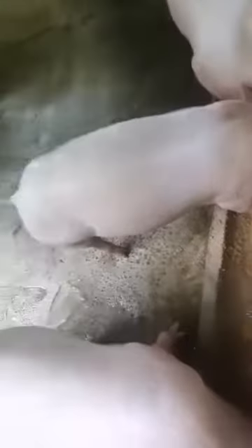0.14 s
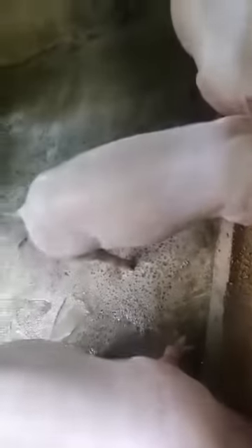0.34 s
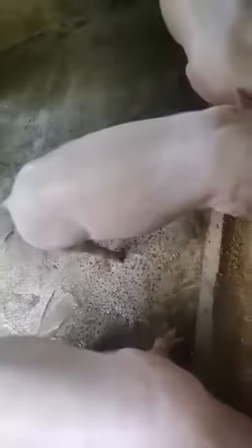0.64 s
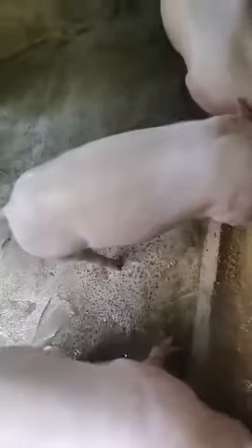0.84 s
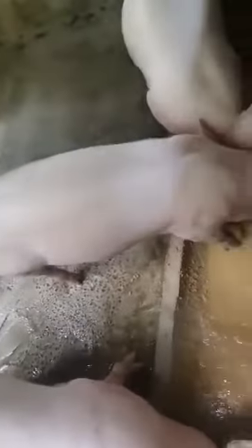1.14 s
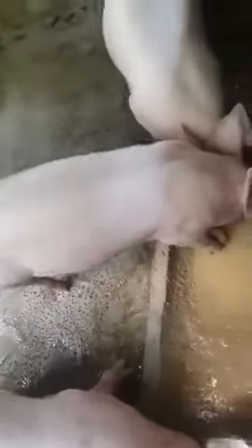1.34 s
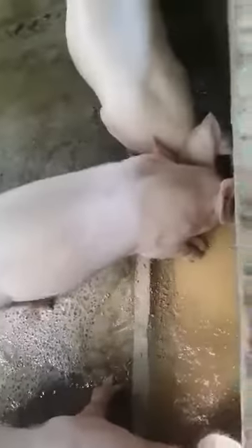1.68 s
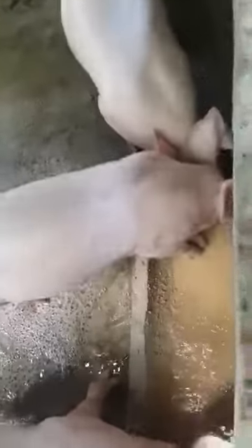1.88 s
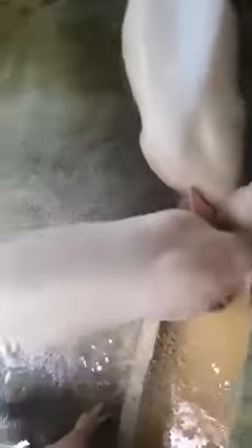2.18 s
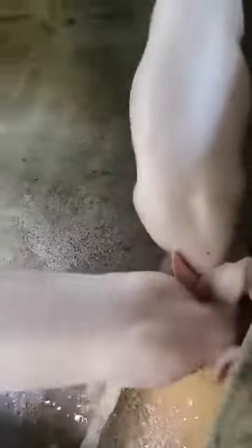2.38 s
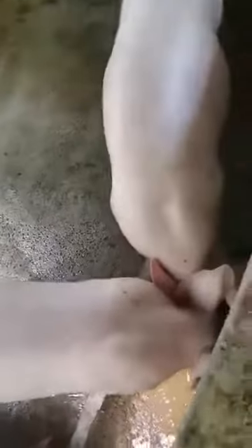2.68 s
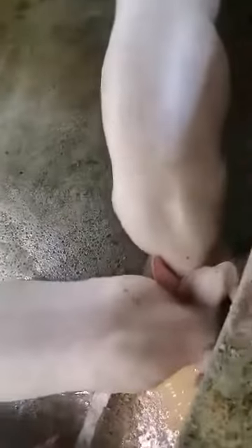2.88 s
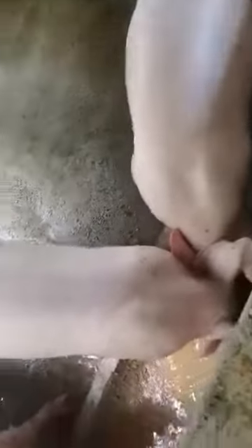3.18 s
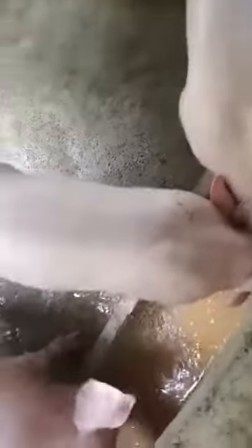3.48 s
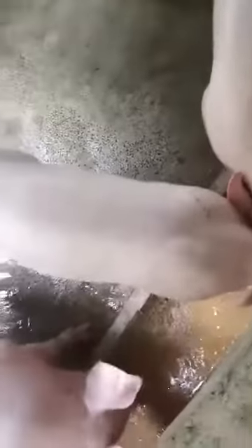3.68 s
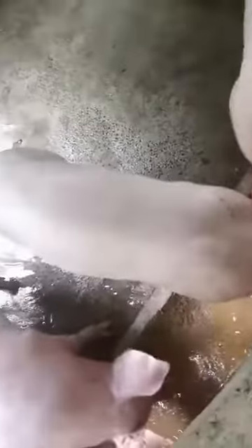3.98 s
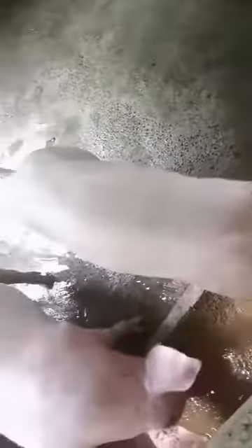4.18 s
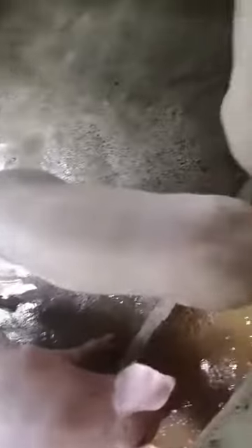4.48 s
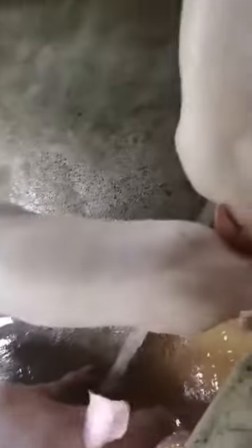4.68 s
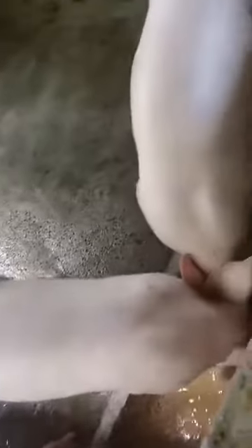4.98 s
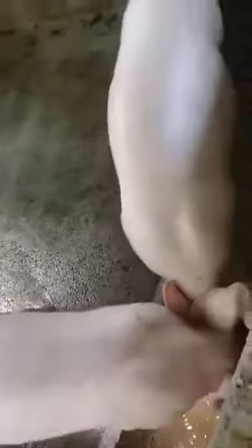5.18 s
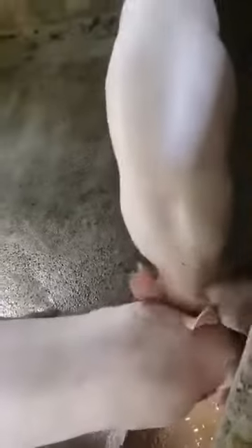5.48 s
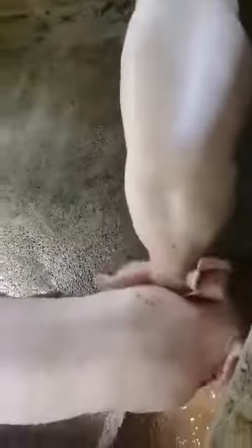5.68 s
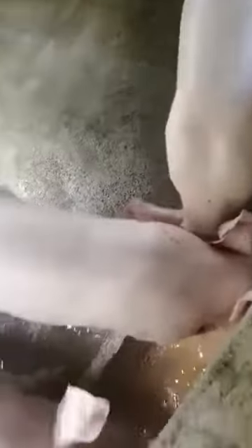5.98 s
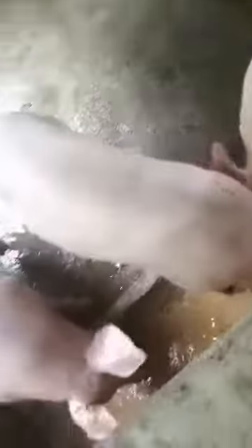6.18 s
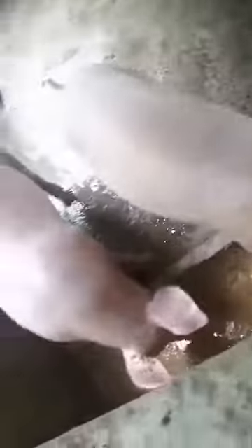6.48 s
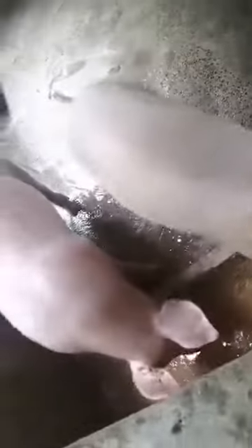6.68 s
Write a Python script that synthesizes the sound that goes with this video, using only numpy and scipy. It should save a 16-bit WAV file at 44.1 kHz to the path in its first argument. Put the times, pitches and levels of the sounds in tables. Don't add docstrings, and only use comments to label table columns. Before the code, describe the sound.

Wet sucking, popping lip smacks and bubbly sloshing from feeding pigs, under bright falling chick peeps and a faint low farmyard drone.

```python
import sys
import numpy as np
from scipy import signal
from scipy.fft import rfft, irfft, next_fast_len
from scipy.io import wavfile
from scipy.ndimage import uniform_filter1d, map_coordinates

SR = 44100
rng = np.random.default_rng(int(sys.argv[2]) if len(sys.argv) > 2 else 0)


def volts_from_db(level):
    exponent = np.asarray(level, float) / 20
    return 10 ** exponent


def waveform_to_disk(signal):
    frames = np.transpose(np.atleast_2d(signal))
    scaled = np.clip(frames, -1, 1) * 32767
    samples = np.round(scaled).astype(np.int16)
    wavfile.write(sys.argv[1], SR, samples)


N = 301644
TIME = np.arange(N) / SR
LEFT_LAG_S = .00021
WET_GROWS, WET_FROM_DB = 0.45, -19.5

# start_s, length_s, level_db, spray_relative_db, slosh_relative_db
DRAWS = [(-.05, 0.083, -44.5, -18, 9), (0.157, 0.28, -35.5, -11.5, -1.5), (0.45, 0.42, -41.5, -28, 2),
         (1.172, 0.31, -41, -16, -19), (1.59, 0.17, -49, -19, -26), (1.792, 0.39, -48.5, 0, 6),
         (2.136, 0.55, -38.5, -19, -2), (2.79, 0.1, -39.5, -5.5, 1), (2.973, 0.36, -46, -10, -24),
         (3.339, 0.36, -40, -5.5, 0), (3.753, 0.22, -33.5, -10.5, 0), (4.104, 0.093, -39, 2, -33),
         (4.276, 0.3, -38, -13.5, -3.5), (4.687, 0.096, -35, -7.5, 0.5), (4.981, 0.21, -35, -12.5, -7),
         (5.122, 0.1, -34, -24, 2), (5.254, 0.39, -38.5, -8.5, -28), (5.67, 0.089, -46.5, -2.5, 8.5),
         (5.834, 0.18, -31.5, -15.5, -23), (6.097, 0.25, -35, -13, -2.5), (6.386, 0.15, -35.5, -37, -16),
         (6.686, 0.11, -50, -2, -34)]
# start_s, peak_db
SPLASHES = [(1.329, -35), (1.5355, -31.5), (1.606, -29), (1.727, -56), (1.946, -53), (2.274, -36.5),
            (2.492, -28.5), (2.65, -30), (3.243, -28), (3.357, -29.5), (3.481, -30), (3.576, -28.5),
            (3.7963, -24.5), (3.926, -32), (4.034, -28.5), (4.0986, -35), (4.489, -28), (4.7744, -35),
            (5.137, -26.5), (5.228, -30.5), (5.389, -26.5), (5.5543, -30.5), (5.6201, -31.5), (6.104, -28),
            (6.4353, -30.5), (6.8004, -47), (.907, -46), (1.2745, -46), (1.689, -46), (1.868, -55),
            (1.978, -35), (2.781, -34.5), (2.865, -35), (2.941, -33), (4.71, -37), (5.285, -34),
            (5.723, -35.5), (6.449, -36)]
# pitch_hz, level_db
MASH_COLOUR = [(240, -71), (480, -12), (972, -7), (1270, -8.5), (2340, -3), (3200, -7), (5500, -14.5),
               (7150, -26.5), (12100, -120)]
# pitch_hz, level_db
SPRAY_COLOUR = [(2650, -16), (4500, -4), (4810, -4), (5470, -12), (6270, -4), (8380, -14.5), (9130, -13),
                (10100, -17.5), (13200, -23.5), (13500, -80), (14000, -43)]
# pitch_hz, level_db
SLOSH_COLOUR = [(120, -32.5), (220, -1.5), (300, -7.5), (500, -2), (800, -36), (1500, -41.5)]
# start_s, second_partial_hz, its_level_db, nose_level_db
GRUNTS = [
    [(0.0, 111.3, -57, -40), (0.07, 118, -52.5, -27.5), (0.235, 117.4, -51, -26)],
    [(3.57, 105.1, -59, -27), (3.632, 105.7, -50, -27), (3.77, 99.3, -60, -30)],
    [(4.26, 113.8, -48, -29.5), (4.354, 138.1, -48, -22), (4.56, 142.2, -55, -37)],
]
# pitch_hz, width_hz, level_db
NOSE = [(258, 160, 8), (356, 42, 15), (630, 79, 5.2)]
# start_s, level_db
DRONE_LEVEL = [(0.0, -40), (1.98, -47), (2.48, -43), (4.53, -39.5), (6.63, -40.5), (6.84, -39)]
# pitch_hz, level_db
DRONE_COLOUR = [(20, -21), (42, -2.0), (54, 14.5), (68, -7.5), (110, 0.5), (300, -38.5)]
# pitch_hz, level_db
YARD_COLOUR = [(15, -10), (25, 10), (65, 2), (348, 3), (901, -69), (3320, -28), (4060, -34), (9280, -21),
               (10000, -15), (13000, -81), (22000, -120)]
# start_s, length_s, start_hz, end_hz, level_db
LONG_PEEPS = [(0.134, 0.182, 4820, 2864, -37), (0.544, 0.19, 4680, 2850, -37.5),
              (0.942, 0.2, 4765, 2916, -36.5), (1.335, 0.18, 4640, 2857, -38.5),
              (1.557, 0.12, 5060, 2810, -42), (2.476, 0.18, 5180, 3254, -40.5),
              (2.972, 0.19, 5183, 3330, -36.5), (3.373, 0.13, 5338, 3730, -36.5),
              (3.553, 0.13, 4720, 2900, -40.5), (4.11, 0.26, 4950, 2986, -48),
              (4.548, 0.135, 5000, 2950, -38.5), (4.929, 0.13, 5040, 3527, -38.5),
              (5.752, 0.14, 5007, 3414, -40.5), (6.411, 0.18, 5410, 3530, -41.5),
              (6.547, 0.12, 4990, 3016, -39)]
# start_s, length_s, start_hz, end_hz, level_db
SHORT_PEEPS = [(0.011, 0.088, 4440, 3770, -41), (0.245, 0.11, 4620, 3700, -42),
               (0.757, 0.076, 4840, 4200, -45), (1.085, 0.16, 5230, 4315, -45),
               (1.793, 0.16, 4960, 4024, -38.5), (2.125, 0.12, 5115, 4377, -37.5),
               (0.777, 0.07, 4060, 3295, -43), (1.984, 0.18, 5080, 4500, -46),
               (2.228, 0.11, 4200, 3180, -38.5), (2.545, 0.11, 4960, 4300, -41.5),
               (3.08, 0.11, 4700, 3570, -44), (3.457, 0.1, 4390, 3650, -45),
               (3.839, 0.069, 4360, 3530, -36), (4.001, 0.089, 4330, 3350, -40.5),
               (4.284, 0.16, 5820, 4880, -44), (4.643, 0.12, 4250, 3890, -45),
               (5.033, 0.086, 5370, 4720, -42.5), (5.105, 0.1, 4490, 3806, -38.5),
               (5.3, 0.097, 4740, 3810, -45), (5.446, 0.064, 4440, 3950, -42),
               (5.65, 0.084, 4690, 4200, -45.5), (5.978, 0.11, 4930, 4354, -45.5),
               (6.145, 0.14, 4630, 3960, -49), (6.474, 0.19, 4900, 4220, -53),
               (6.779, 0.095, 5750, 5480, -43), (0.059, .13, 4370, 3916, -46),
               (0.449, .12, 4710, 4515, -53.5), (4.374, 0.086, 4590, 3750, -41.5),
               (4.678, 0.049, 4070, 3760, -41), (6.601, 0.086, 4340, 3700, -48)]
# delay_s, level_db, left_minus_right_db
WALLS = [(.013, -11, 6), (.029, -13, -6), (.047, -14, 5), (.07, -16, -5)]
# pitch_hz, level_db
SCATTERS = [(3000, -5), (3800, 0)]
# start_s, direct_sound_db
BROOD_NEARNESS = [(.8, 0), (1.1, -4), (2, -4), (2.2, -1), (2.5, -4.5), (6.84, -3.5)]
# pitch_hz, decay_s
PEN_ECHO = [(200, 0.067), (2000, 0.3), (3100, 0.2), (4500, 0.5), (10000, 0.05)]
# start_s, peak_db, mouth_pitch_hz
LIP_SMACKS = [(0.406, -22.5, 670), (1.169, -24, 1440), (1.604, -24, 1470), (1.884, -20.5, 1150),
              (2.271, -18.5, 1510), (2.495, -18, 970), (2.523, -17.5, 635), (2.643, -16, 946),
              (2.807, -21, 695), (2.94, -14.5, 870), (3.199, -20.5, 1080), (3.577, -15, 864),
              (3.832, -19.5, 1430), (3.918, -17.5, 980), (4.035, -17, 950), (4.722, -20.5, 1480),
              (4.971, -20.5, 1130), (5.133, -21, 1120), (5.186, -14.5, 995), (5.286, -16.5, 990),
              (5.553, -15, 983), (5.917, -15.5, 1090), (5.972, -13.5, 1050), (6.063, -18, 700),
              (0.951, -24, 2020), (1.296, -17, 2180), (1.312, -24, 1640), (1.417, -20, 2020),
               (1.681, -18.5, 2590), (1.957, -25.5, 1580), (2.011, -21, 1530), (2.221, -16.5, 2010),
               (2.477, -23.5, 2170), (2.923, -32, 1860), (3.311, -17.5, 1660), (3.344, -19.5, 1640),
               (3.363, -16, 2210), (3.474, -18.5, 1910), (3.759, -15.5, 1675), (4.117, -21.5, 1550),
               (4.238, -19.5, 1730), (4.397, -16, 1570), (4.489, -20.5, 1820), (5.147, -17, 2300),
               (5.396, -14, 1780), (5.62, -20, 2330), (5.733, -17, 2370), (6.434, -17.5, 2110),
               (6.457, -16.5, 2370)]
# start_s, peak_db, mouth_pitch_hz
SNAPS = [(.51, -25.5, 447), (.51, -23, 835), (3.27, -22, 610), (3.41, -36, 1090), (5.391, -13, 2100),
         (5.553, -17, 2050), (5.732, -33, 1970), (4.42, -19, 1140), (1.988, -23, 2180),
         (2.106, -25.5, 1730), (2.216, -21, 2570), (2.378, -20, 2520), (2.484, -22.5, 1640),
         (2.64, -15.5, 2560), (2.94, -14.5, 390), (3.155, -35, 1270), (3.758, -18, 2420), (3.8, -17.5, 980),
         (3.85, -19, 1103), (3.918, -19.5, 1710), (4.035, -21, 1530), (4.035, -14.5, 2520),
         (4.063, -24.5, 1130), (4.24, -23, 2450), (4.954, -29, 2280), (5.197, -23, 1080),
         (5.207, -22.5, 1480), (6.62, -23, 1480), (6.744, -21.5, 2070), (1.169, -23.5, 2220),
         (1.329, -22, 870), (1.411, -22, 965), (1.689, -24, 870), (1.884, -40, 1640), (1.986, -24, 577),
         (2.01, -21.5, 496), (2.228, -19.5, 930), (2.245, -20, 408), (2.666, -18, 1080), (2.924, -20, 1090),
         (3.21, -25.5, 960), (3.31, -19.5, 1040), (3.358, -19.5, 650), (3.382, -18, 1080),
         (3.474, -21.5, 1500), (3.545, -22.5, 450), (4.174, -25, 1090), (4.49, -24, 960),
         (4.575, -29, 1340), (4.795, -26.5, 1350), (5.148, -15, 1760), (5.3, -23, 990), (5.389, -17, 1110),
         (5.4, -28, 1000), (5.407, -21, 1750), (5.421, -16.5, 1790), (5.433, -19, 1840), (5.875, -22, 980),
         (5.92, -17.5, 470), (5.975, -27, 2200), (6.0, -29, 1080), (6.33, -22.5, 2230), (6.55, -23, 1170)]
SMACKS = LIP_SMACKS
# start_s, left_minus_right_db
SNOUT_PLACES = [(.4, -3), (1.35, -5), (1.95, 0), (2.3, 0), (2.6, 4), (3.3, 1), (3.8, 0), (4.3, 0),
                (4.75, -3), (5.3, -2.5), (5.7, -4), (6.5, -2)]
# start_s, peak_db, pitch_hz, left_minus_right_db
TICKS = [(0.406, -21.5, 1170, -2), (1.331, -28, 1460, -2), (1.691, -26, 1120, -1), (1.953, -21, 4180, -4),
         (2.012, -27, 3100, -3), (1.54, -25.5, 4430, -24), (1.548, -20.5, 4800, 3), (1.729, -21.5, 7140, 1),
         (1.948, -21, 4020, -14), (1.9793, -18.5, 4700, -15), (1.985, -23, 4400, 0),
         (1.605, -21.5, 1490, -8), (1.418, -22, 2150, -7), (2.271, -24, 1470, 0), (4.398, -21, 1530, 0),
         (5.186, -13, 990, -2), (5.286, -29, 960, -2), (3.3598, -31, 5960, 18), (3.7948, -40, 6630, 18),
         (4.0325, -20.5, 3960, -5), (4.099, -21.5, 5050, 6), (4.495, -23, 3960, 19),
         (5.228, -23, 3500, -10), (5.556, -24.5, 5800, -6)]
# start_s, length_s, level_db
PUFFS = [
    (2.068, 0.15, -34.5),
    (2.306, 0.07, -45),
    (2.388, 0.019, -25),
    (2.494, 0.14, -19.5),
    (2.724, 0.027, -27),
    (2.783, 0.24, -42),
]
# start_s, peak_db, swing_hz
THUMPS = [
    (2.45, -8.5, 88),
    (2.555, -14, 114),
    (2.618, -3.5, 129),
    (2.773, -11, 72),
]
# pitch_hz, level_db
RUMBLE_COLOUR = [(15, -36), (50, -5.0), (95, -10.5), (160, -20.5), (400, -38), (2000, -57.5)]
# start_s, length_s, pulse_rate_hz, level_db
SNORTS = [
    (3.76, 0.099, 62, -38),
    (5.189, 0.066, 52.16, -41),
    (5.484, 0.087, 56, -41.5),
    (5.893, 0.17, 54.03, -37),
    (6.194, 0.18, 60.1, -38.5),
    (6.389, 0.21, 59.16, -40.5),
]
# pitch_hz, width_hz, level_db
SNOUT = [(260, 43, 8), (519, 11.4, 0), (133.2, 4.1, 7.5)]
# pitch_hz, level_db
AUDIBLE = [(1000, -82), (3000, -55.5), (6000, -54), (9400, -117), (9900, -17), (12600, -98), (12850, -44)]
# pitch_hz, left_minus_right_db
PORTS = [(100, 2.5), (600, 2.5), (1200, -2), (2300, -5.5), (4100, 0.5), (7500, 6), (13000, 11)]
# pitch_hz, level_db
GRILLE = [(9600, 0), (10000, -3), (12500, -4), (12900, 6), (13300, 6)]


def unit(x):
    return x / np.sqrt(np.mean(x ** 2) + 1e-20)


def along(points, hz):
    f, v = np.transpose(points)
    return np.interp(np.log(hz + 1), np.log(f + 1), v)


def curves(rows):
    s, *cols = np.transpose(rows)
    return [np.interp(TIME, s, c) for c in cols]


def wobble(rate):
    return map_coordinates(rng.standard_normal(int(N * rate / SR) + 4), [TIME * rate])


def filtered(x, response):
    m = next_fast_len(N + SR // 2)
    return irfft(rfft(x, m) * response(np.fft.rfftfreq(m, 1 / SR)), m)[..., :N]


def cavities(modes):
    def response(f):
        total = 0
        for k, (centre, width, db) in enumerate(modes):
            ring = 1j * f * width / (centre * centre - f * f + 1j * f * width)
            total = total + (-1) ** k * volts_from_db(db) * ring
        return total
    return response


def hiss(spectrum, alike, lag_s=0):
    own, shared = rng.standard_normal((2, N)), rng.standard_normal(N)
    share = np.clip(alike, 0, 1)
    shared = np.array([np.roll(shared, int(lag_s * SR)), shared])
    noise = np.sqrt(share) * shared + np.sqrt(1 - share) * own
    return unit(filtered(noise, lambda hz: volts_from_db(along(spectrum, hz))))


def bubbles(s, hz, t60, gain, pan_db, lag, rise, size=1024):
    t = np.arange(size) / SR
    swell = 1 - np.exp(-t * hz[:, None] * 0.8)
    fade = volts_from_db(-60 * t / t60[:, None]) * swell
    climb = 1 + rise * t / t60[:, None]
    tone = gain[:, None] * fade * np.sin(2 * np.pi * hz[:, None] * t * climb)

    def port(side):
        first = np.clip((s + side * lag / 2) * SR, 0, N).astype(int)
        at = first[:, None] + np.arange(size)
        heard = tone * volts_from_db(side * pan_db / 2)[:, None]
        return np.bincount(at.ravel(), heard.ravel(), N + size + 1)[:N]
    return np.array([port(1), port(-1)])


def held(s, length, rise_s, fall_s):
    t = TIME - np.array(s)[:, None]
    ending = 1 + (np.array(length)[:, None] - t) / fall_s
    return np.clip(np.minimum(t / rise_s, ending), 0, 1) ** 2


def bursts(s, db, fade_db_s):
    kicks = np.bincount((s * SR).astype(int), volts_from_db(db), N)
    return signal.lfilter([1], [1, -volts_from_db(-abs(fade_db_s) / SR)], uniform_filter1d(kicks, size=64))


def flows():
    s, length, db, spray_db, slosh_db = np.transpose(DRAWS)
    draws = volts_from_db([db, db + spray_db, db + slosh_db]) @ held(s, length, rise_s=0.04, fall_s=0.11)
    s, db, hz = np.transpose(SMACKS)
    gush_db = db + WET_GROWS * (db - WET_FROM_DB) / 2 - 16
    gush = bursts(s, gush_db, fade_db_s=299)
    gulp = bursts(s, gush_db - 2 - 14 * np.log2(hz / 1000), fade_db_s=299)
    s, db = np.transpose(SPLASHES)
    splash = bursts(s, db - 5, fade_db_s=253)
    lull = volts_from_db(-48 + np.array([[0], [-20], [-5]]))
    return np.sqrt(draws ** 2 + lull ** 2 + np.array([gush, splash, gulp]) ** 2)


def patches(x, patchy_db):
    z = signal.stft(x, nperseg=512)[2]
    field = uniform_filter1d(rng.standard_normal(z.shape[1:]), 5, 0)
    field = uniform_filter1d(field, 6, 1)
    return signal.istft(z * volts_from_db(patchy_db * unit(field)), nperseg=512)[1][:, :N]


def sucking(count=3000):
    mash_flow, spray_flow, slosh_flow = flows()
    u, g = rng.random((count, 2)), rng.standard_normal((count, 3))
    s = u[:, 0] * N / SR
    hz = np.clip(1500 * np.exp(0.415 * g[:, 0]), 450, 6000)
    size = volts_from_db(np.minimum(-5 * np.log(1 - u[:, 1]), 9))
    shift = np.interp(u[:, 0] * N, np.arange(N), wobble(3))
    lag = LEFT_LAG_S + 0.00024 * shift + .00005 * g[:, 2]
    crackle = unit(bubbles(s, hz, 26 / hz, size, 3 * g[:, 1], lag, rise=0.1, size=640))
    clumps = .9 * np.tanh(wobble(35) / 1.5)
    turbulence = hiss(MASH_COLOUR, alike=0.21, lag_s=LEFT_LAG_S)
    body = mash_flow * volts_from_db(3.0 * clumps) * (volts_from_db(-5.5) * crackle + volts_from_db(0.5) * turbulence)
    spray = spray_flow * volts_from_db(0.31 * clumps + 2.5 * wobble(27)) * hiss(SPRAY_COLOUR, alike=0.058)
    slosh = slosh_flow * volts_from_db(-8.0 + 0.21 * wobble(33)) * hiss(SLOSH_COLOUR, alike=0.92)
    return volts_from_db(-1.0) * patches(body + spray + slosh, patchy_db=2.6)


def pulses(rate_hz, jitter):
    turns = np.cumsum(rate_hz * (1 + jitter * wobble(40))) / SR
    closures = np.diff(np.floor(turns), prepend=0)
    return unit(closures * volts_from_db(0.37 * rng.standard_normal(N))), turns


def grunts():
    out = np.zeros(N)
    for rows in GRUNTS:
        hz, db, nose_db = curves(rows)
        gate = np.clip(np.minimum(TIME - rows[0][0] + 0.00092, rows[-1][0] - TIME) / 0.039, 0, 1)
        train, turns = pulses(hz / 2, jitter=.06)
        clean = np.sin(4 * np.pi * turns) + volts_from_db(-9.5) * np.sin(2 * np.pi * turns)
        nose = unit(filtered(train + 0.59 * rng.standard_normal(N), cavities(NOSE)))
        hum = volts_from_db(db + 16.0 + 2.1 * wobble(30)) * clean
        out += gate * (hum + volts_from_db(nose_db - 12.5) * nose)
    return out


def yard():
    drone = hiss(DRONE_COLOUR, alike=0.88)
    swell_db = 2.5 * wobble(1.8)
    bustle = volts_from_db(-57.5 + swell_db) * hiss(YARD_COLOUR, alike=0.78)
    return volts_from_db(curves(DRONE_LEVEL)[0] - 6.0) * drone + bustle


def flock(knee, count=26):
    peeps = []
    for a, b, c in rng.random((count, 3)):
        peeps.append((a * N / SR, .1 + 0.048 * b, 4500 + 800 * c, 3700 + 650 * c, -54, knee))
    return peeps


def chicks():
    out = np.zeros(N + SR)
    waver_hz = 60 * np.pad(wobble(120), (0, SR))
    long_knee, short_knee, sag = .66, .47, .36
    peeps = [(*p, long_knee) for p in LONG_PEEPS] + [(*p, short_knee) for p in SHORT_PEEPS]
    for s, length, top_hz, end_hz, db, knee in peeps + flock(short_knee):
        u = np.arange(int(length * SR)) / (length * SR)
        span = slice(int(s * SR), int(s * SR) + len(u))
        fall = np.interp(u, [0, knee, (1 + 3 * knee) / 4, 1], [0, sag, .68, 1])
        fall = uniform_filter1d(fall, 300, mode="nearest")
        hz = top_hz + (end_hz - top_hz) * fall + waver_hz[span]
        swell = (.2 + u) * np.clip(np.minimum(u / .3, (1 - u) / .04), 0, 1)
        out[span] += volts_from_db(db + 6.5) * swell * np.sin(2 * np.pi * np.cumsum(hz) / SR)
    return out[:N] * volts_from_db(3 * wobble(90))


def pen(x):
    hz, t, z = signal.stft(rng.standard_normal((2, SR // 2)), SR, nperseg=256)
    tail = signal.istft(z * volts_from_db(-60 * t / along(PEN_ECHO, hz)[:, None]), SR, nperseg=256)[1]
    tail = tail / np.linalg.norm(tail[0])
    return signal.fftconvolve(np.pad(x, (200, 0))[None], tail, axes=1)[:, :N]


def distant_brood(peeps):
    scattered = filtered(peeps, lambda hz: volts_from_db(along(SCATTERS, hz)))
    thrown = 0
    for delay_s, db, pan_db in WALLS:
        sides_db = db + np.array([[pan_db], [-pan_db]]) / 2
        thrown = thrown + volts_from_db(sides_db) * np.roll(scattered, int(delay_s * SR))
    spot = (TIME / .4).astype(int) % 6
    ringing = volts_from_db(-3) * sum(pen(scattered * (spot == k)) for k in range(6))
    direct = volts_from_db(curves(BROOD_NEARNESS)[0]) * np.array([peeps, np.roll(peeps, 2)])
    return direct + thrown + ringing


def smacks(count=10):
    rows = SMACKS + SNAPS
    s, db, hz = (np.repeat(c, count) for c in np.transpose(rows))
    pan_db = np.interp(s, *np.transpose(SNOUT_PLACES))
    g = rng.standard_normal((len(rows), count, 3))
    lag = np.repeat(LEFT_LAG_S + 0.00018 * g[:, 0, 2], count)
    follower = np.tile(np.arange(count) > 0, len(rows))
    g = g.reshape(-1, 3) * follower[:, None]
    spread = np.tile(np.linspace(.6, .1, count), len(rows))
    late = (.013 - 0.0073 * spread) * abs(g[:, 0])
    pitch = np.clip(hz * np.exp(spread * (g[:, 1] + .5 * follower)), 400, 5500)
    bareness = np.clip(1 + (db + 18) / 14, .5, 1)
    life = (.6 - .1 * follower) / np.sqrt(pitch) * bareness
    strength = volts_from_db(db + 4 - 10 * follower - 300 * late)
    pops = bubbles(s + late, pitch, life, strength, pan_db, lag, rise=0.056, size=768)
    spit_hz, spit_gain = 7000 * np.exp(0.42 * g[:, 2]), volts_from_db(db - 29 - 38 * late)
    spit = bubbles(s + late, spit_hz, 0.02 + 0 * s, spit_gain, pan_db, lag, rise=0.098, size=256)
    return pops + spit


def lingering(count=14):
    s, db, hz = (np.repeat(c, count) for c in np.transpose(SMACKS + SNAPS))
    late, g = .05 * rng.random(len(s)), rng.standard_normal((2, len(s)))
    pitch = hz * np.exp(0.051 * g[0])
    drain_db = 19.5 * np.log2(np.minimum(hz / 1300, 1))
    wet_db = db + WET_GROWS * (db - WET_FROM_DB)
    strength = volts_from_db(wet_db - 244 * late + 5.3 * g[1] + drain_db)
    pan_db = np.interp(s, *np.transpose(SNOUT_PLACES))
    return bubbles(s + late, pitch, 0.43 / np.sqrt(pitch), strength, pan_db, LEFT_LAG_S + 0 * s, rise=0.02)


def ticks():
    s, db, hz, pan_db = np.transpose(TICKS)
    return bubbles(s, hz, np.minimum(45 / hz, .011), volts_from_db(db + 4.5), pan_db, 0 * s, rise=0.013, size=512)


def port_air():
    start, length, level_db = np.transpose(PUFFS)
    flow = volts_from_db(level_db) @ held(start, length, rise_s=0.056, fall_s=0.18)
    rumble = hiss(RUMBLE_COLOUR, alike=0)[0]
    swings = np.zeros(N)
    for s, db, hz in THUMPS:
        t = TIME - s
        swings += volts_from_db(db) * np.exp(-(t * hz * 2.1) ** 2) * np.cos(2 * np.pi * hz * t)
    return flow * unit(rumble * volts_from_db(2.6 * wobble(23.94))) + swings


def snorts():
    start, _, rate_hz, _ = np.transpose(SNORTS)
    train = pulses(np.interp(TIME, start, rate_hz), jitter=0.081)[0]
    source = train + 1.5 * rng.standard_normal(N)
    effort = np.zeros(N)
    for s, length, _, db in SNORTS:
        progress = np.clip((TIME - s) / length, 0, 1)
        effort += volts_from_db(db + 2.5) * np.sin(np.pi * progress ** 0.51)
    return effort * unit(filtered(source, cavities(SNOUT)))


def scene():
    mouths = smacks() + lingering() + ticks()
    voices = grunts() + snorts()
    walls = volts_from_db(-7) * pen(mouths.mean(axis=0) + .3 * voices)
    air = port_air() * np.array([[1], [.02]])
    return sucking() + voices + yard() + distant_brood(chicks()) + mouths + walls + air


def thinned(x, mask_db, step_db, whim_db, size=12):
    hz, t, z = signal.stft(x, SR, nperseg=1536)
    power = abs(z) ** 2

    def spread(bands):
        return np.pad(np.repeat(bands, size, axis=1), ((0, 0), (0, 1), (0, 0)))
    band = spread(power[:, :768].reshape(2, -1, size, len(t)).mean(axis=2))
    chance = uniform_filter1d(rng.standard_normal((1, 768 // size, len(t))), 3, axis=2)
    whim = spread(volts_from_db(whim_db * unit(chance)))
    thinnable = (hz > 1200)[:, None]
    masker = uniform_filter1d(band * thinnable, 8 * size, axis=1) * volts_from_db(mask_db) ** 2
    faintest = volts_from_db(along(AUDIBLE, hz) - 25.0)[:, None] ** 2
    fickle = 2 + 3.1 * (hz > 9700)[:, None]
    limit = (masker + faintest) * whim ** fickle * thinnable
    keep = (band > limit) & (power > limit * volts_from_db(step_db) ** 2) & (hz < 13400)[:, None]
    return signal.istft(z * keep, SR, nperseg=1536)[1][:, :N]


def roll_off(x):
    return signal.sosfilt(signal.butter(12, 14420, fs=SR, output="sos"), x)


def record(dry):
    def response(hz):
        return volts_from_db(np.outer([.5, -.5], along(PORTS, hz)) + along(GRILLE, hz))
    mix = thinned(filtered(dry, response), mask_db=-16.5, step_db=2.5, whim_db=11.5)
    return roll_off(mix)


dry = scene()
out = record(dry)
waveform_to_disk(out)
```